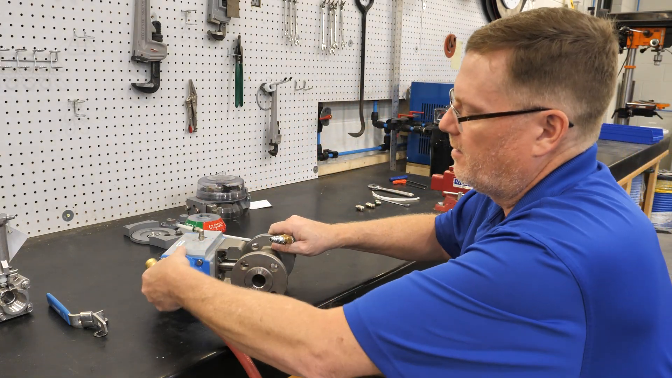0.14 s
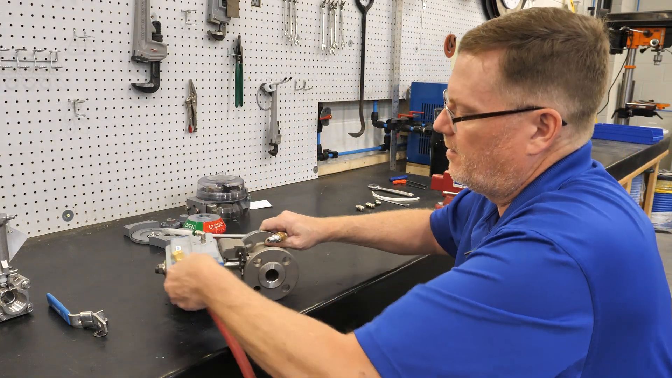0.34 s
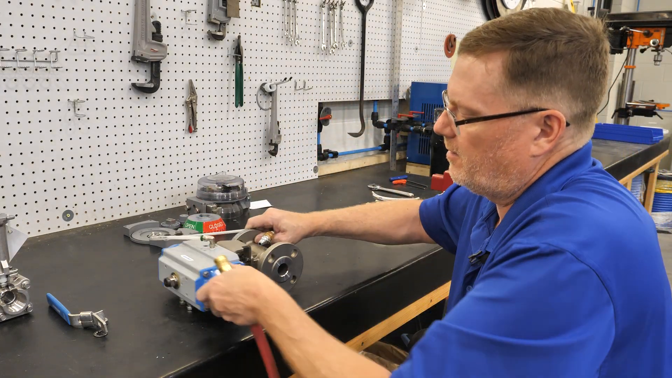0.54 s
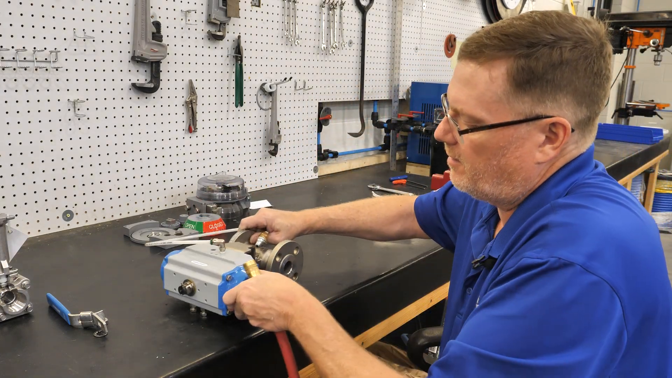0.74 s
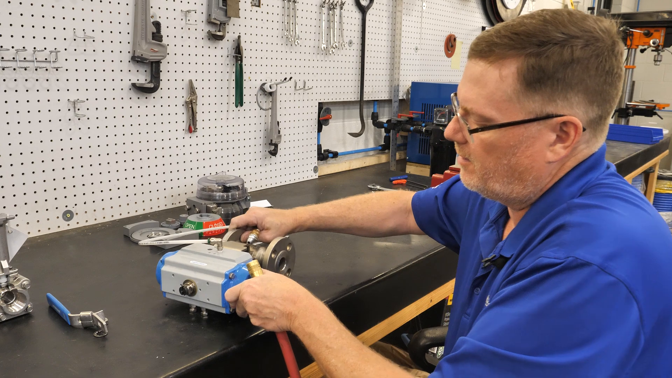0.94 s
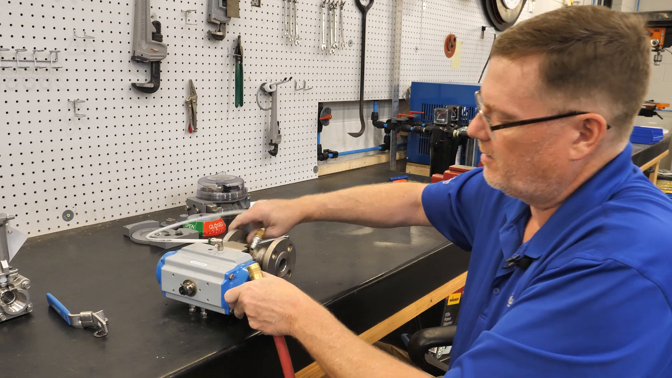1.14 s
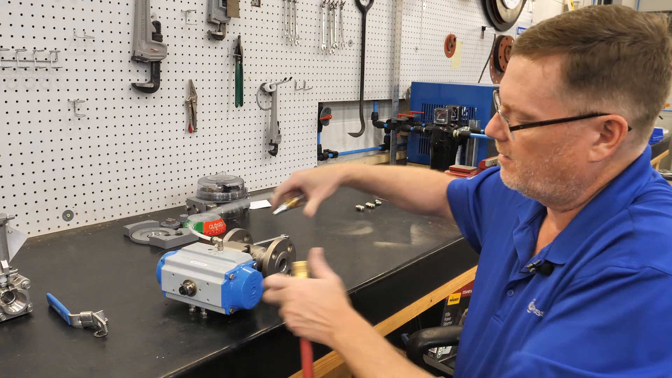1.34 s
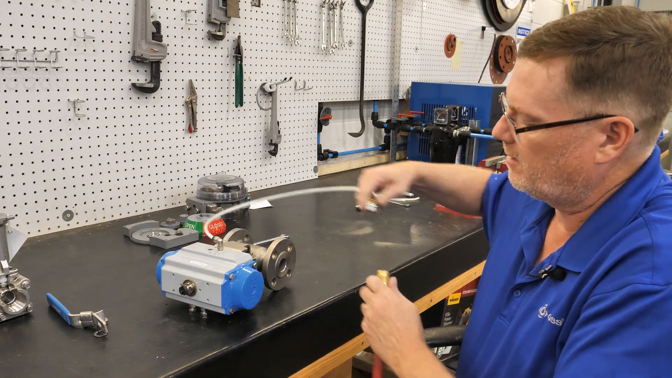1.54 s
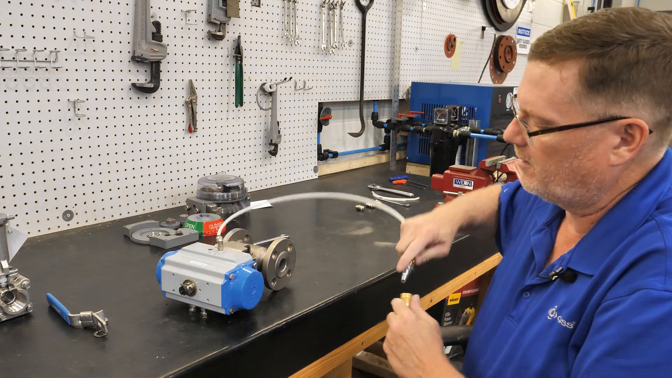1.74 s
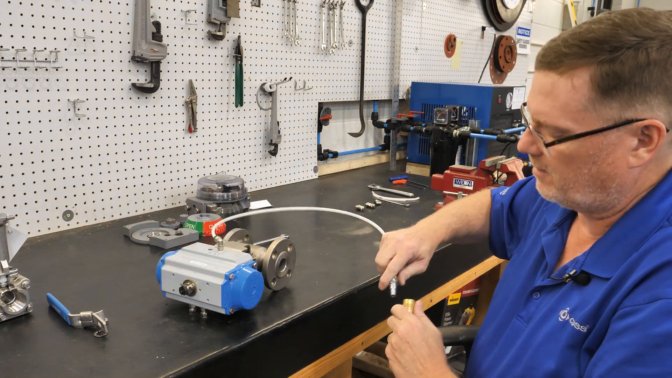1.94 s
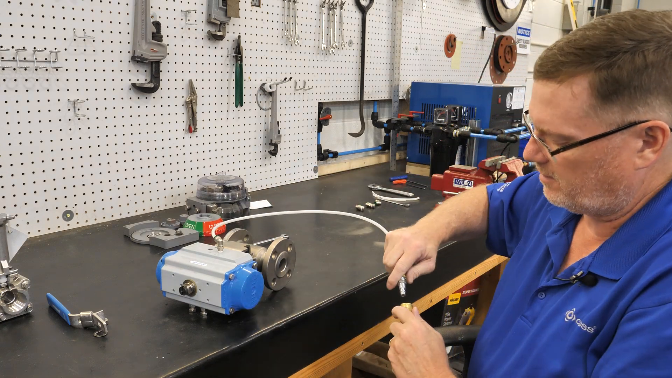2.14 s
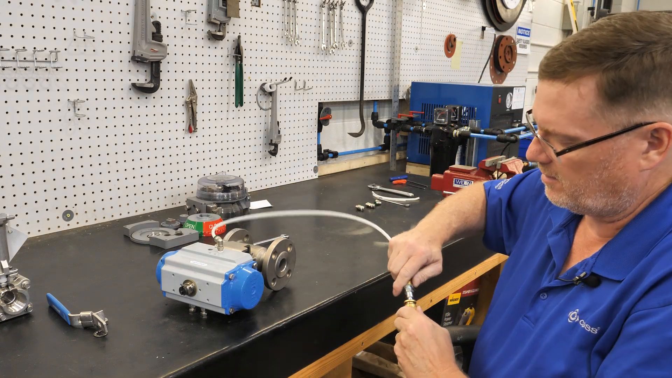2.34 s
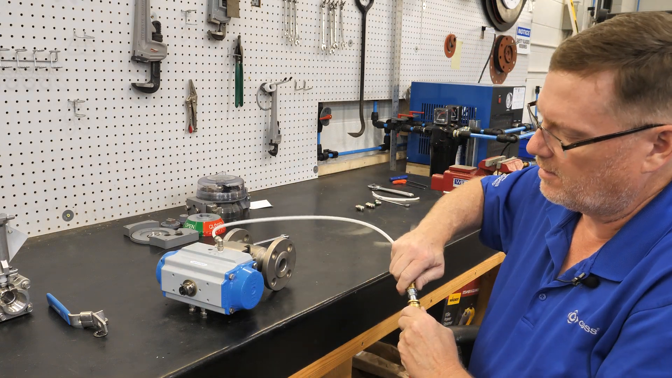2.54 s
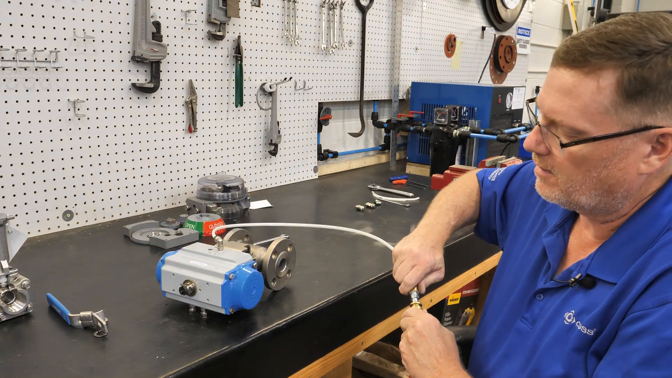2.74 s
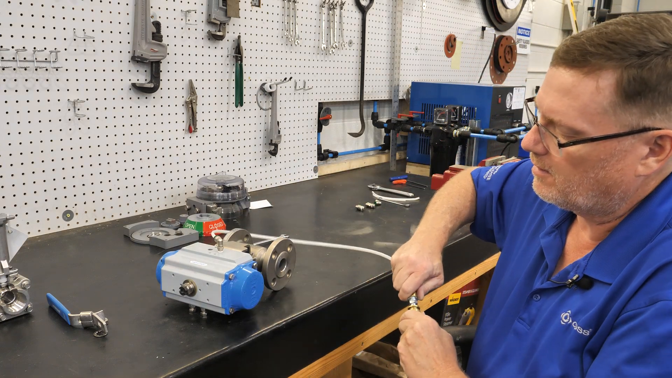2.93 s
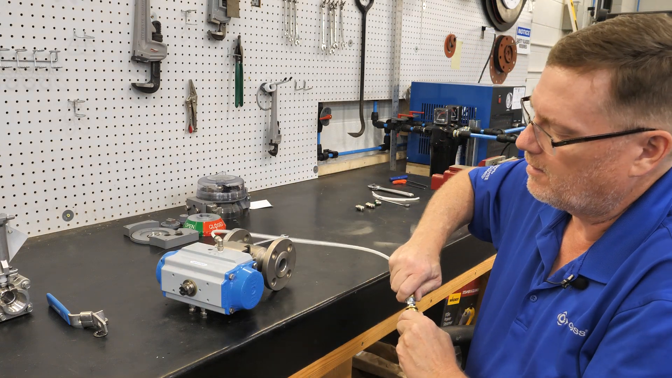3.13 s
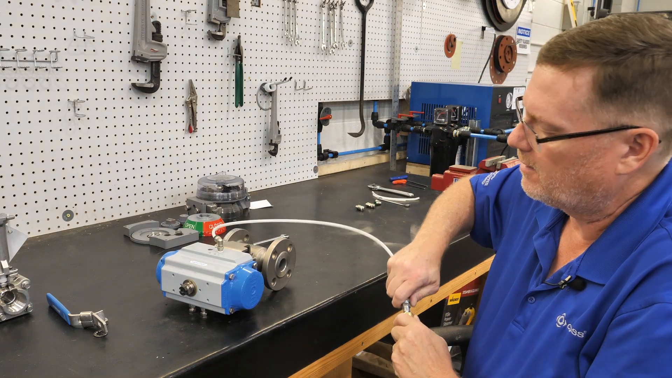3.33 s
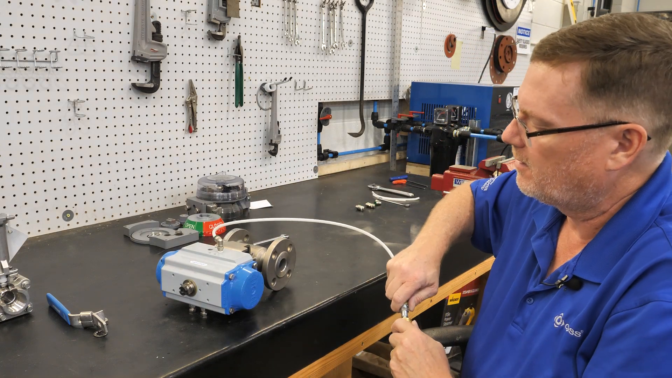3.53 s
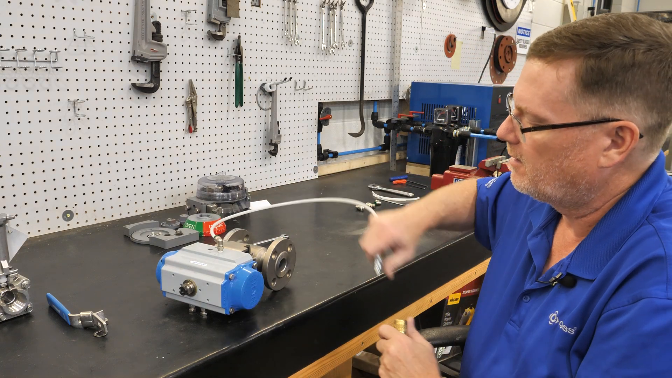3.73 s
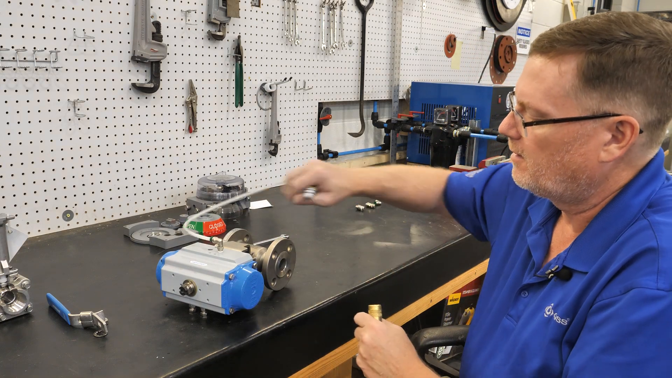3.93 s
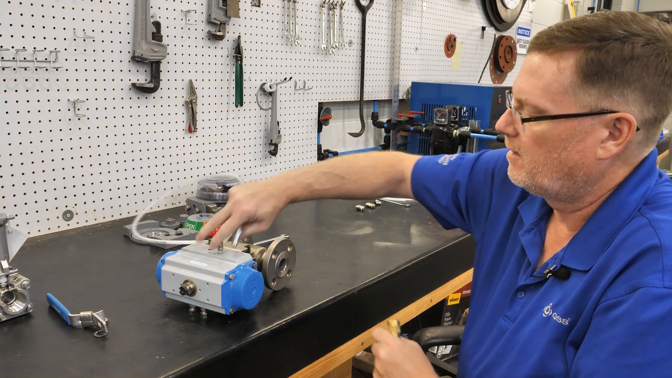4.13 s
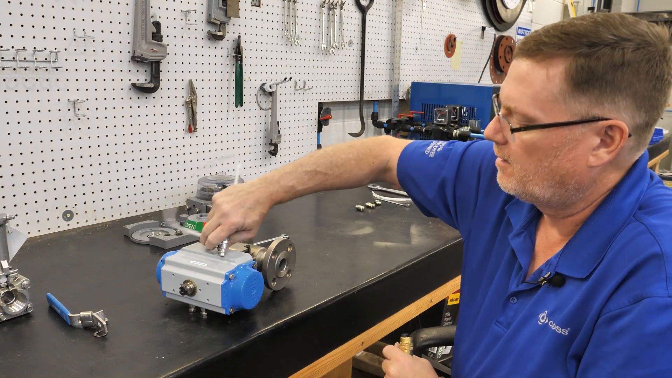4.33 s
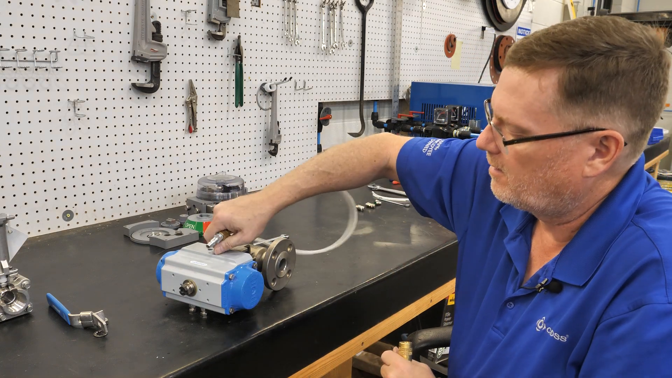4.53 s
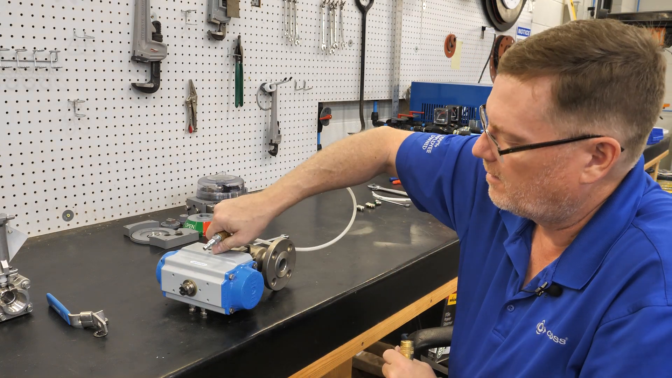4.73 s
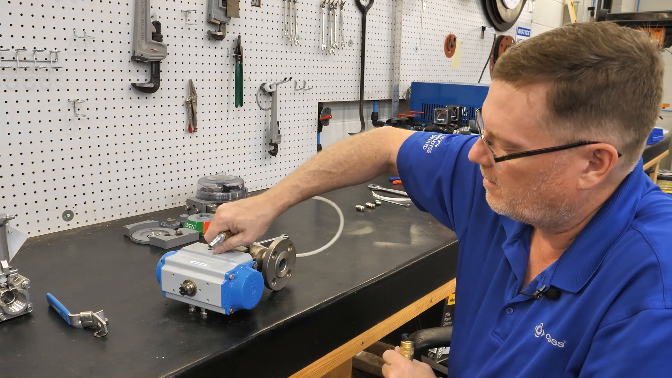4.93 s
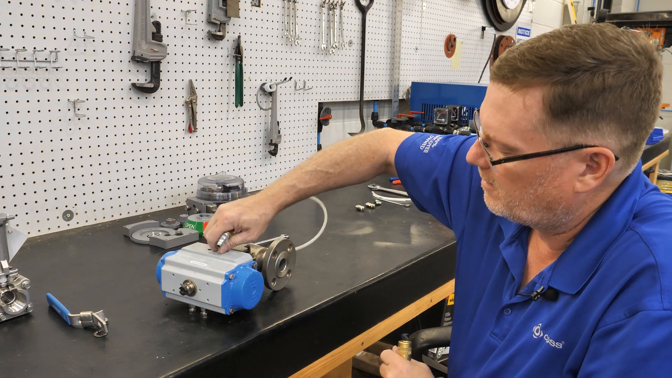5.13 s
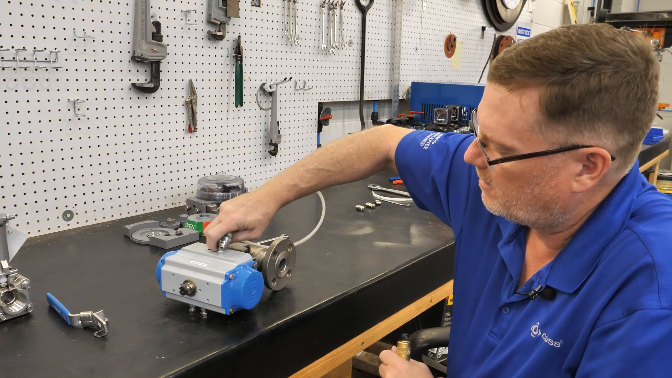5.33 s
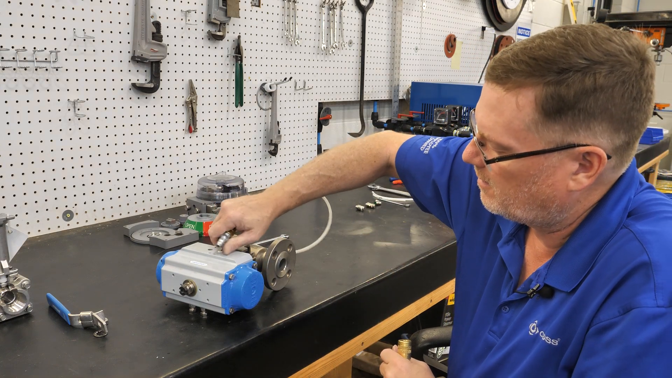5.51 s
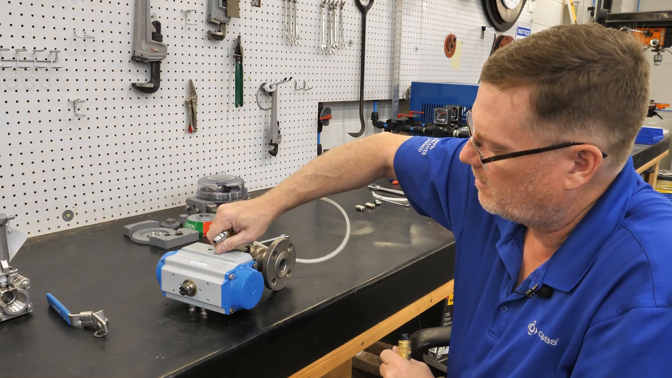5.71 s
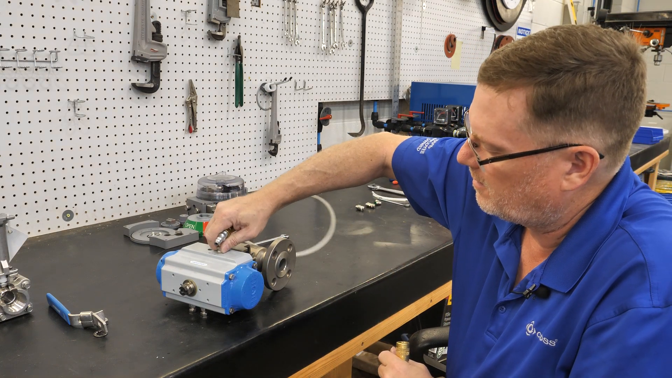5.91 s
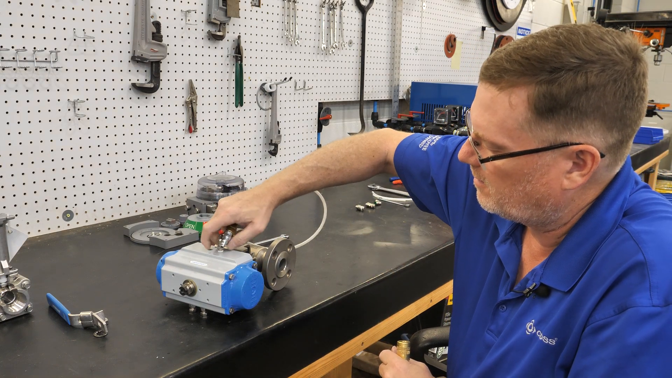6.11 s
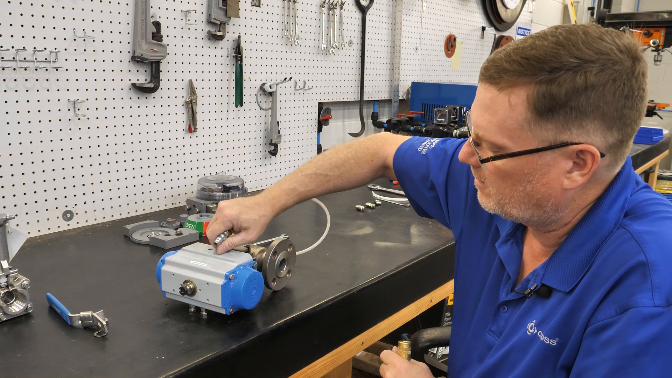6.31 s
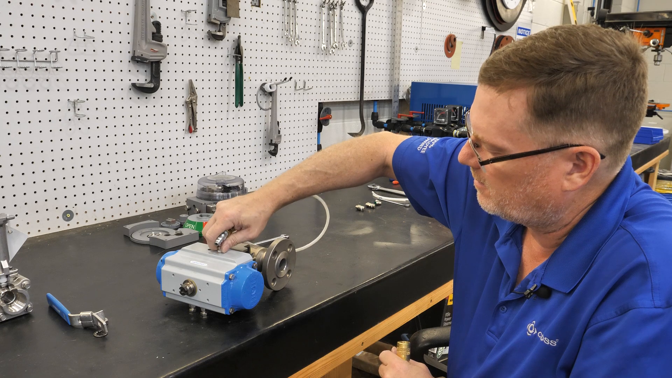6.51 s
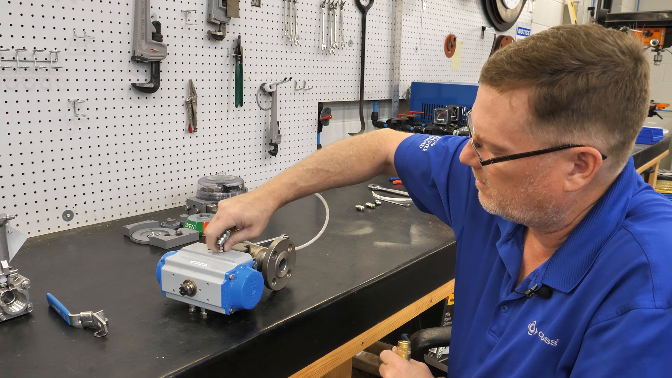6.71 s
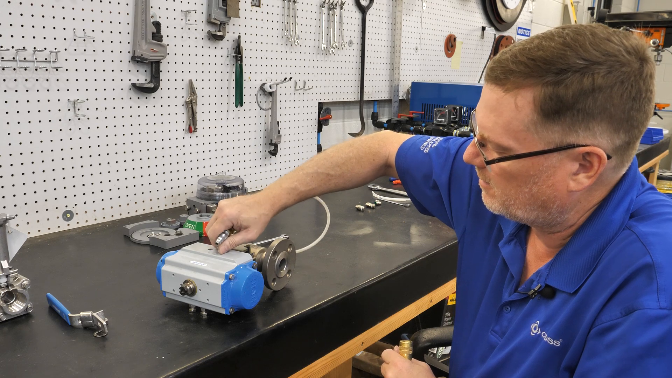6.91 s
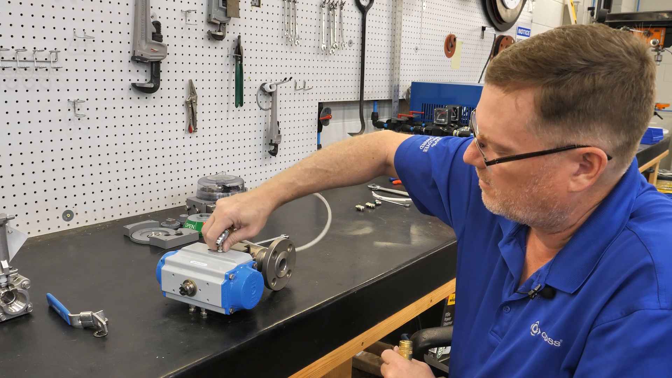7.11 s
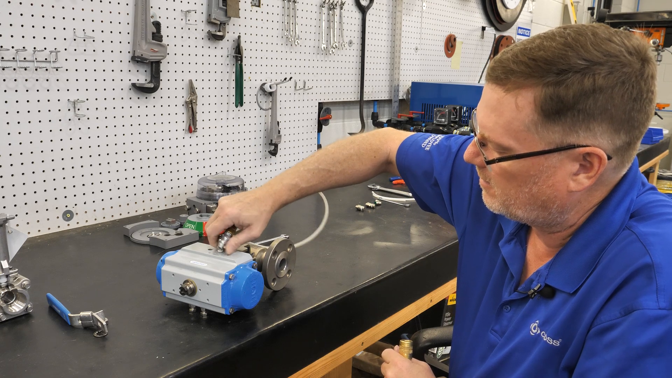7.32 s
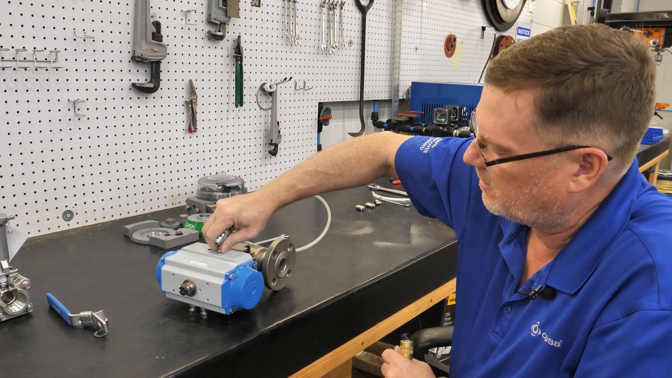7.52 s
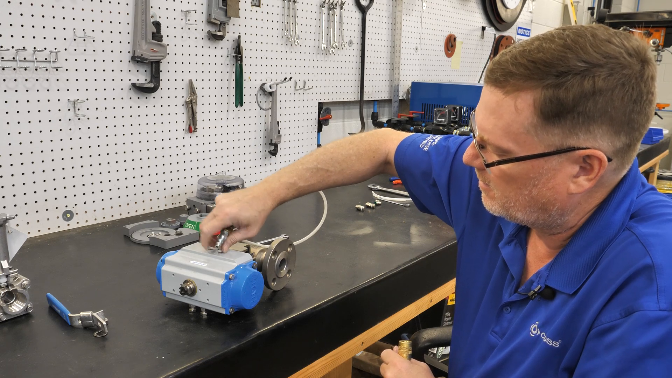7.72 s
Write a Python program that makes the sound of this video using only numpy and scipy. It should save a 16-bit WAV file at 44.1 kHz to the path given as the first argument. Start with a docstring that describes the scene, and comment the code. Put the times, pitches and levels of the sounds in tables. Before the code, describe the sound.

Knocks and a thump from a valve actuator dragged on a bench, coupler clicks, two loud compressed-air hisses, then a metal ping and sparse ticks.

```python
"""In a humming workshop, hands rub an air-powered valve actuator and drag it round on a bench; it knocks and thumps.
Its plastic tube squeaks, then clicks into a brass coupler: struck metal is a sum of dying tones plus a crack.
Air (shaped noise) leaks past the tube until it seats, and spurts once more. The tube comes out, and the actuator
empties with a sinking, hollow hiss. Then a steel fitting pings, and ticks at the actuator's port, knocking the
housing. One close microphone hears it all, with echoes from the bench and the room."""
import sys
import numpy as np
from scipy import signal
from scipy.fft import rfft, irfft, next_fast_len
from scipy.io import wavfile
from scipy.ndimage import map_coordinates

SR = 44100
rng = np.random.default_rng(int(sys.argv[2]) if len(sys.argv) > 2 else 0)


def transcribe(signal):
    """Save signal, clipped to [-1, 1], as a 16-bit WAV file at the path in sys.argv[1]."""
    frames = np.atleast_2d(signal).T
    limited = np.clip(frames, -1, 1)
    pcm = np.round(limited * 32767).astype(np.int16)
    wavfile.write(sys.argv[1], SR, pcm)


N = 342216

# tones of the steel fitting held against the port, each varied a little from blow to blow:
# (frequency [Hz], level [dB], time to fade by 60 dB [s])
PORT_MODES = [(1930, 2.5, 0.053), (2780, -8, 0.053), (4070, -6.5, 0.027), (5120, -3.5, 0.025),
              (5130, -5, 0.052), (5800, -1.5, 0.013), (6620, -20, 0.036), (10090, -18, 0.019),
              (13220, 0, 0.021), (15600, -13, 0.02)]


def amp(db):
    """Turn decibels into gain."""
    return 10 ** (np.asarray(db) / 20)


def unit(x):
    """Scale x to an rms of 1."""
    return x / np.sqrt(np.mean(x ** 2) + 1e-20)


def along(points, hz):
    """Read (frequency, value) points at hz, in straight lines on a log frequency axis."""
    f, values = np.transpose(points)
    return np.interp(np.log(hz + 1), np.log(f + 1), values)


def curves(rows):
    """Turn rows of (time, values...) into one curve per value, with a point for every sample."""
    s, *columns = np.transpose(rows)
    return [np.interp(np.arange(N) / SR, s, column) for column in columns]


def since(s):
    """Count the seconds since time s, for every sample."""
    return np.arange(N) / SR - s


def hump_db(s, rise, fall):
    """Make a rounded swell: 0 dB at time s, 20 dB down at rise before it and at fall after it."""
    t = since(s)
    return -20 * (t / np.where(t < 0, rise, fall)) ** 2


def wobble(rate):
    """Draw a smooth random curve through `rate` random points a second."""
    knots = rng.standard_normal(int(N * rate / SR) + 4)
    return map_coordinates(knots, [np.arange(N) * rate / SR])


def filtered(x, response):
    """Multiply the spectrum of x by a response that depends on frequency."""
    m = next_fast_len(N + 8192)
    spectrum = rfft(x, m) * response(np.fft.rfftfreq(m, 1 / SR))
    return irfft(spectrum, m)[..., :N]


def noise(colour):
    """Make noise of rms 1 whose spectrum follows (frequency, level) points."""
    return unit(filtered(rng.standard_normal(N), lambda hz: amp(along(colour, hz))))


def add(track, s, sound):
    """Mix a sound into the track at time s."""
    room = track[max(round(s * SR), 0):][:len(sound)]
    room += sound[:len(room)]


def strike(modes, attack, crack_db, crack_t60):
    """One blow of peak 1: dying tones, each at a slightly random strength, plus the noisy crack of contact."""
    hz, db, t60 = np.transpose(modes)[:, :, None]
    t = np.arange(int(min(t60.max(), 1) * SR)) / SR
    size = amp(db + 1.5 * rng.standard_normal(db.shape) - 60 * t / t60)
    start_phase = rng.random(hz.shape)
    ring = np.sum(size * np.sin(2 * np.pi * (hz * t + start_phase)), axis=0)
    crack = amp(crack_db - 60 * t / crack_t60) * rng.standard_normal(len(t))
    blow = (ring + crack) * (1 - np.exp(-t / attack))
    return blow / np.abs(blow).max()


def focused(x, centre_hz, octave_db):
    """A blow at peak 1, weaker by octave_db for each octave away from the pitch the contact favours."""
    m = next_fast_len(2 * len(x))
    octaves = np.log2((np.fft.rfftfreq(m, 1 / SR) + 1) / centre_hz)
    distance = np.hypot(octaves, .15)  # rounds off the tip of the peak
    y = irfft(rfft(x, m) * amp(-octave_db * distance), m)[:len(x)]
    return y / np.abs(y).max()


def stutter(s, length, db, fade_db, gap):
    """Give (time, level) of slightly uneven contacts, roughly gap apart, that fade over the length."""
    part = np.linspace(0, 1, 1 + int(abs(length) / gap + .7))
    scatter = .04 * gap * rng.standard_normal(len(part)) * (part > 0)
    return zip(s + length * part + scatter, db - fade_db * part)


def dulled(x, top_hz):
    """Take off the highest treble: the brief give of a hand-held contact dulls what lies above top_hz."""
    return filtered(x, lambda hz: 1 / (1 + (hz / top_hz) ** 6))


def ambience():
    """Steady background noise, strongest in the bass, with almost no top treble; a slightly unsteady hum."""
    # background noise: (frequency [Hz], level [dB])
    background_colour = [(12, -40.5), (20, -14.5), (53, -4), (70, -5), (88, -11.5), (158, -9.5),
                         (334, -16.5), (385, -15.5), (442, -17.5), (1510, -23), (5000, -40), (6990, -42.5),
                         (7600, -43), (11200, -40), (15700, -64.5)]
    # hum, before its slow drift: (frequency [Hz], rms level [dB])
    hum_tones = [(59.5, -76), (151, -85), (177, -82.5), (360, -90.5), (389, -82.5), (512, -88.5)]
    t = np.arange(N) / SR
    hum = np.zeros(N)
    for hz, db in hum_tones:
        level = amp(db + 1.5 * wobble(1.5)) * np.sqrt(2)  # a sine peaks at root 2 times its rms
        hum += level * np.sin(2 * np.pi * hz * t + wobble(1.5))
    return hum + amp(-67.5) * noise(background_colour)


def handling():
    """Skin and plastic slide over the housing in small uneven grabs; the tube gives one squeak that climbs."""
    # low rub and high rustle: (frequency [Hz], level [dB])
    rub_colour = [(200, -1), (600, 1.5), (1150, -1), (1600, -11), (3000, -30)]
    rustle_colour = [(1500, 0), (3500, 6), (8000, -3.5), (11000, -0.5), (13000, -18), (15700, -36)]
    # hand strokes: (strongest at [s], rise and fall [s], rub level [dB], rustle level [dB])
    strokes = [(.02, 0.15, -62, -73), (.32, 0.21, -63.5, -81), (.62, .45, -78, -82.5),
               (1.18, 0.11, -70, -81), (1.35, 0.11, -65.5, -85), (1.789, .4, -68.5, -79)]
    # path of the squeak, before its quick pitch jitter: (time [s], frequency [Hz], peak level [dB])
    squeak_path = [(.235, 5740, -79), (.25, 5950, -72), (.262, 7700, -73), (.273, 8900, -63),
                   (.295, 8950, -91)]
    rub = sum(amp(rub_db + hump_db(s, span, span)) for s, span, rub_db, _ in strokes)
    rustle = sum(amp(rustle_db + hump_db(s, span, span)) for s, span, _, rustle_db in strokes)
    slow_grabs_db, quick_grabs_db = 2 * wobble(40), 4 * wobble(160)
    sliding = rub * amp(slow_grabs_db) * noise(rub_colour)
    sliding += rustle * amp(quick_grabs_db) * noise(rustle_colour)

    hz, db = curves(squeak_path)
    sounding = (since(squeak_path[0][0]) > 0) & (since(squeak_path[-1][0]) < 0)
    jittery_hz = hz * (1 + .015 * wobble(900))
    squeak = sounding * amp(db) * np.sin(2 * np.pi * np.cumsum(jittery_hz) / SR)
    return sliding + squeak


def port_tick(centre_hz, focus_db):
    """One dry contact of the steel fitting with the port; each lands on a new spot, which shifts its tones."""
    spot = np.exp(.04 * rng.standard_normal())
    modes = np.array(PORT_MODES) * [spot, 1, 1]
    tick = strike(modes, attack=0.00013, crack_db=11, crack_t60=0.016)
    return focused(tick, centre_hz, focus_db)


def actuator():
    """Each low knock rings the housing and rattles the fitting; the valve's weight thumps the bench."""
    # tones of the housing, then of the bench: (frequency [Hz], level [dB], time to fade by 60 dB [s])
    body_modes = [(354.2, 3.5, 0.053), (580, 0.5, .045), (667.4, 1.5, 0.075), (724, -6, 0.04),
                  (829, -2, 0.072), (935, -5.5, 0.084), (1087, -6.5, 0.059), (1384, -6, 0.082)]
    bench_modes = [(54.4, -4, 0.29), (99, -5.5, 0.23), (118, -2, 0.098), (171.3, -7.5, 0.19)]
    # low knocks of the housing: it judders on the bench, later it is knocked by ticks at its port:
    # (time [s], length [s], peak level [dB], fade over the length [dB], centre frequency [Hz])
    housing_knocks = [(.011, 0.0064, -42, -0.5, 824), (.053, 0.011, -39.5, 2, 820),
                      (0.153, .062, -40, 4, 810), (.282, 0.0012, -46.5, 5, 700), (.3, .075, -41, 11, 870),
                      (.42, 0.00074, -43, -3, 910), (1.731, .113, -53, 0.5, 650),
                      (1.873, 0.01, -49, 6, 654), (1.942, 0, -51, 0, 627), (2.131, .1, -50, 3.5, 650),
                      (2.416, 0.011, -46, 0, 650), (2.471, 0.017, -48, 2.5, 650), (5.613, 0, -57.5, 0, 681),
                      (6.046, 0, -51.5, 0, 703), (6.335, 0.0073, -58, 0, 673), (7.408, 0.012, -61, 0, 651)]
    # the heavy valve rocking and settling: (time [s], length [s], peak level [dB], fade over the length [dB])
    thumps = [(.655, 0.053, -57, 1.5), (.811, 0.029, -47, -1.5), (1.074, .032, -35, 0.5),
              (1.205, .165, -46.5, 7), (4.588, 0, -50, 0)]
    knock_gap_s, rock_gap_s = .034, 0.075
    rattle_db, rattle_hz = -15, 3920  # rattle of the fitting: level against its knock, favoured pitch
    out = np.zeros(N)
    for start, length, peak_db, fade_db, centre_hz in housing_knocks:
        for s, db in stutter(start, length, peak_db, fade_db, knock_gap_s):
            knock = strike(body_modes, attack=0.0022, crack_db=-2.5, crack_t60=.065)
            add(out, s, amp(db) * focused(knock, centre_hz, octave_db=18.5))
            add(out, s, amp(db + rattle_db) * port_tick(rattle_hz, focus_db=8))
    for rocking in thumps:
        for s, db in stutter(*rocking, rock_gap_s):
            thump = strike(bench_modes, attack=0.0031, crack_db=-36, crack_t60=.04)
            add(out, s, amp(db) * thump)
    return out


def steel_ticks():
    """The hand-held steel fitting ticks on the actuator; a scrape is a run of ticks as it catches."""
    # (time [s], length [s], level before dulling [dB], centre frequency [Hz])
    ticks = [(0.687, 0.014, -57.5, 3640), (1.1655, 0.0028, -43.5, 5600), (4.5036, 0, -46.5, 4260),
             (5.362, 0.0014, -51, 5050), (5.5639, .05, -53.5, 4500), (6.0474, 0.0015, -44.5, 4590),
             (6.2103, 0, -54.5, 5600), (6.3165, .022, -54.5, 3300), (6.8635, 0.00071, -51.5, 5860),
             (6.9293, 0.013, -60, 3410), (7.4037, 0.02, -57.5, 3800)]
    catch_gap_s, scrape_fade_db = 0.018, 4  # the last catch of a scrape is this much weaker
    out = np.zeros(N)
    for start, length, level_db, centre_hz in ticks:
        for s, db in stutter(start, length, level_db, scrape_fade_db, catch_gap_s):
            add(out, s, amp(db) * port_tick(centre_hz, focus_db=8.5))
    return dulled(out, top_hz=9300)


def brass_clicks():
    """The tube's end meets the brass coupler; metal held in the fingers clicks dryly."""
    # (time [s], level before dulling [dB], centre frequency [Hz], focus [dB per octave])
    clicks = [(2.3485, -44, 12910, 20.5), (2.3508, -46.5, 3313, 9), (2.3615, -45, 12990, 20),
              (2.386, -34.5, 7200, 12.5), (2.415, -41.5, 6650, 5.5), (2.4425, -51, 8060, 11),
              (2.471, -38, 3020, 6.5), (2.4753, -34, 7400, 3.5), (2.496, -52, 8700, 8)]
    # tones of the coupler: (frequency [Hz], level [dB], time to fade by 60 dB [s])
    brass_modes = [(2794, -4, .025), (4300, -14.5, .02), (6746, -13.5, .03), (7320, 1, .03),
                   (7720, 1.5, 0.025), (8150, -2.5, .018), (8800, -4, .02), (10480, -10.5, .025),
                   (13000, -10, .015)]
    out = np.zeros(N)
    for s, db, centre_hz, focus_db in clicks:
        click = strike(brass_modes, attack=.0002, crack_db=8, crack_t60=0.0091)
        add(out, s, amp(db) * focused(click, centre_hz, focus_db))
    return dulled(out, top_hz=11880)


def jet(hiss_db, roar_db, colour, dulling, buffet_db):
    """A free jet hisses, duller as it weakens; where it hits fingers and coupler, its lumpy eddies roar."""
    # (frequency [Hz], level [dB])
    roar_colour = [(20, -10), (55, -0.5), (130, 1), (230, -2), (350, 0.5), (570, -1.5), (850, -1),
                   (1400, -4.5), (2200, -8), (4000, -21), (9000, -46.5)]
    fizz = noise(colour)
    low = filtered(fizz, lambda hz: 1 / (1 + (hz / 11000) ** 8))
    treble = amp(dulling * (hiss_db - hiss_db.max())) * (fizz - low)  # fades faster than the rest
    hiss = amp(hiss_db + 1.1 * wobble(160)) * (low + treble)
    roar = amp(roar_db + buffet_db * wobble(130)) * noise(roar_colour)
    return hiss + roar


def leak():
    """Air escapes ever harder past the tube until it seats; one hollow spurt follows as the seal closes."""
    # (frequency [Hz], level [dB])
    leak_colour = [(300, -29.5), (1500, -10.5), (3000, -8.5), (4400, -6), (5600, -3), (6800, -5), (8000, 0),
                   (9000, 0.5), (10200, -2), (11400, -1), (12700, -3.5), (14000, -0.5), (15700, -5.5)]
    spurt_colour = [(1500, -34), (2700, -10), (3900, -3), (5200, -1), (6100, 2), (6800, -6), (7500, 0),
                    (8600, -8.5), (10000, -19), (15000, -32)]
    open_s, attack_s, seat_s, seat_db_per_s = 2.769, 0.0097, 2.965, 1399
    leak_hiss_db, hiss_grows_db_per_s = -16.5, 33  # level on seating, and growth until then
    leak_roar_db, roar_grows_db_per_s = -24, 110
    spurt_s, spurt_rise_db_per_s, spurt_fall_db_per_s = 3.018, 200, 480
    core_db, spurt_hiss_db, spurt_roar_db = -18, -30, -33  # the spurt's hollow core, hiss and roar

    opening = 1 - np.exp(-np.maximum(since(open_s), 1e-6) / attack_s)
    before, after = np.minimum(since(seat_s), 0), np.maximum(since(seat_s), 0)
    flow_db = 40 * np.log10(opening) - seat_db_per_s * after
    t = since(spurt_s)
    spurt_db = np.minimum(spurt_rise_db_per_s * t, -spurt_fall_db_per_s * t)
    spurt_db += seat_db_per_s * before  # keeps the spurt down until the tube seats
    hiss_db = np.maximum(leak_hiss_db + flow_db + hiss_grows_db_per_s * before, spurt_hiss_db + spurt_db)
    roar_db = np.maximum(leak_roar_db + flow_db + roar_grows_db_per_s * before, spurt_roar_db + spurt_db)
    hollow_core = amp(core_db + spurt_db) * noise(spurt_colour)
    return jet(hiss_db, roar_db, leak_colour, dulling=.1, buffet_db=2.5) + hollow_core


def gap_tone(hz, db, width_hz):
    """Churning air in a hollow gap: a breathy tone that glides as the gap opens and the pressure falls."""
    eddies = filtered(rng.standard_normal((2, N)), lambda f: 1 / (1 + (f / width_hz) ** 2))
    phase = 2 * np.pi * np.cumsum(hz) / SR
    return amp(db) * unit(eddies[0] * np.cos(phase) + eddies[1] * np.sin(phase))


def exhaust():
    """The actuator empties through the tube; as the jet collapses, the gap's resonances stand out."""
    # (frequency [Hz], level [dB])
    exhaust_colour = [(300, -22), (1500, -7), (3000, -3.5), (4200, -4.5), (5500, -2), (6600, -2.5),
                      (7800, -0.5), (9500, -1.6), (11000, -3.5), (12000, -2), (13200, -3.5), (15700, -5)]
    # breathy resonances of the gap between tube, coupler and fingers:
    # (strongest at [s], rise [s], fall [s], level [dB], centre frequency then [Hz], glide [Hz per s])
    gap_modes = [(3.648, 0.12, 0.082, -28, 3200, 3002.5), (3.77, .1, 0.15, -48, 3680, 700),
                 (3.712, 0.1328, 0.033, -32.5, 4650, -1000), (3.705, .3, 0.16, -32, 7650, -1000),
                 (3.874, 0.043, 0.014, -51, 7750, 1), (3.682, 0.042, 0.12, -33, 9300, -1500),
                 (3.638, 0.0801, .15, -31.5, 12100, -9000)]
    start_s, rise_db_per_s = 3.324, 900.5
    exhaust_hiss_db, sag_db_per_s = -16, 18  # the hiss sags slowly at first
    empty_s, collapse_power = 0.59, 4.6  # the collapse takes off 60 dB by empty_s after the start
    exhaust_roar_db, roar_rise_db_per_s, roar_fall_db_per_s = -19, 1401, 77

    before, age = np.minimum(since(start_s), 0), np.maximum(since(start_s), 0)
    collapse_db = 60 * (age / empty_s) ** collapse_power
    hiss_db = exhaust_hiss_db + rise_db_per_s * before - sag_db_per_s * age - collapse_db
    roar_db = exhaust_roar_db + roar_rise_db_per_s * before - roar_fall_db_per_s * age
    hollow = np.zeros(N)
    for s, rise, fall, db, hz, glide in gap_modes:
        level_db = db + hump_db(s, rise, fall) + rise_db_per_s * before
        hollow += gap_tone(hz + glide * since(s), level_db, width_hz=600)
    return jet(hiss_db, roar_db, exhaust_colour, dulling=0.34, buffet_db=1.2) + hollow


def loose_fitting():
    """The steel fitting is struck loose: it bounces on the port and, free of the fingers, rings on."""
    # the blow that sets it ringing, and its bounces: (time [s], peak level [dB])
    bounces = [(4.5854, -36.5), (4.59, -45), (4.608, -44.5)]
    # tones of the free fitting: (frequency [Hz], level [dB], time to fade by 60 dB [s])
    ping_modes = [(5556, -4, 0.16), (6250, 1, 0.23), (6200, -7, .22), (6815, -6.5, 0.76),
                  (11510, -11, 0.37)]
    out = np.zeros(N)
    for s, db in bounces:
        add(out, s, amp(db) * strike(PORT_MODES, attack=0.00035, crack_db=12, crack_t60=0.039))
    ping = strike(ping_modes, attack=0.00032, crack_db=-21, crack_t60=0.099)
    add(out, bounces[0][0], amp(-34.5) * ping)
    return out


def near_surfaces(x, level_db, t60):
    """Bench top, tools and pegboard scatter back a dense, short echo that ripples the spectrum."""
    t = np.arange(SR // 20) / SR
    echo = rng.standard_normal(len(t)) * amp(-60 * t / t60) * (t > .001)
    scattered = signal.fftconvolve(x, echo / np.linalg.norm(echo))[:N]
    return (x + amp(level_db) * scattered) / np.hypot(1, amp(level_db))


def workshop(x):
    """The large room's tail: each frequency dies at its own speed."""
    # (frequency [Hz], time to fade by 60 dB [s])
    fade_times = [(100, .8), (500, 1.8), (1500, 1.2), (4000, 0.82), (7500, 0.69), (15000, 0.87)]
    # colour of the tail: (frequency [Hz], level [dB])
    tail_colour = [(100, -3.5), (1000, -3.5), (2200, -1.5), (4000, 3), (7500, -1), (10000, -6), (15000, -8)]
    hz, t, z = signal.stft(rng.standard_normal(3 * SR // 2), SR, nperseg=256)
    fading = amp(-60 * t / along(fade_times, hz)[:, None])
    tail = signal.istft(z * fading, SR, nperseg=256)[1]
    delayed = np.pad(tail / np.linalg.norm(tail), (round(.012 * SR), 0))  # starts 12 ms late
    wet = signal.fftconvolve(x, delayed)[:N]
    return filtered(wet, lambda f: amp(along(tail_colour, f)))


def scene():
    """All sources in the room, heard by one microphone on both channels."""
    floor, hands, knocks = ambience(), handling(), actuator()
    metal = near_surfaces(steel_ticks() + brass_clicks() + loose_fitting(), level_db=-13.0, t60=0.06)
    blasts = near_surfaces(leak() + exhaust(), level_db=-12, t60=.06)
    direct = hands + knocks + metal + blasts
    mono = direct + amp(-18) * workshop(direct) + floor
    return np.array([mono, mono])


def record(dry):
    """The recorder falls off steeply at its band limit."""
    top_hz = 15800
    return filtered(dry, lambda hz: 1 / np.sqrt(1 + (hz / top_hz) ** 400))


dry = scene()
out = record(dry)
transcribe(out)
```